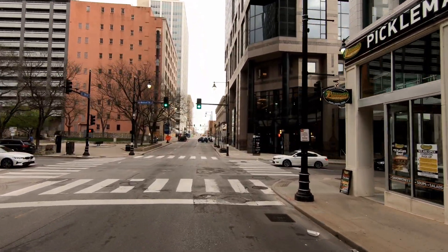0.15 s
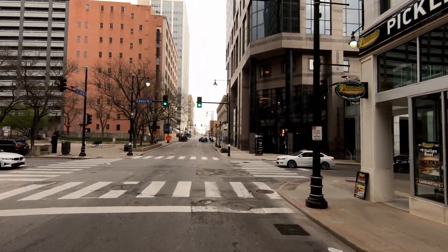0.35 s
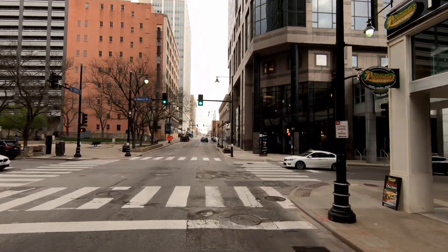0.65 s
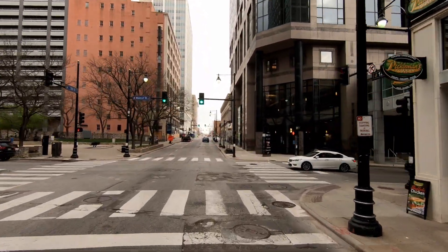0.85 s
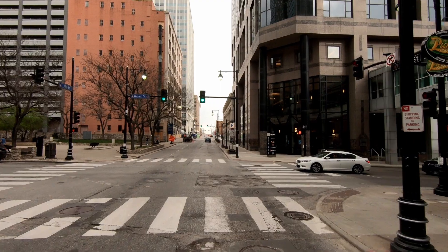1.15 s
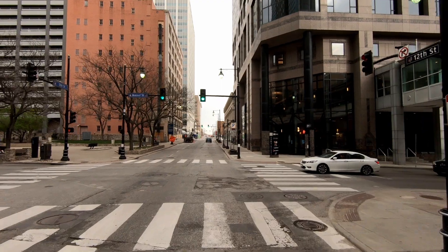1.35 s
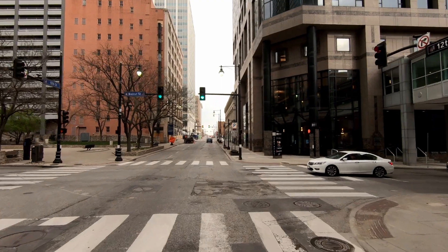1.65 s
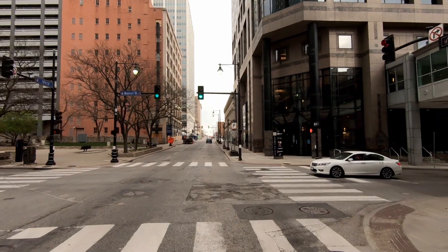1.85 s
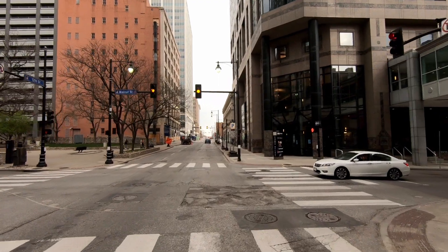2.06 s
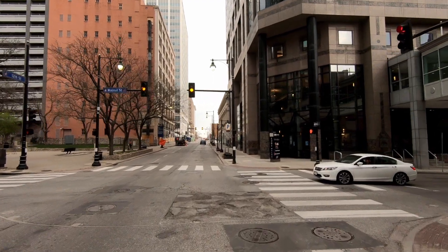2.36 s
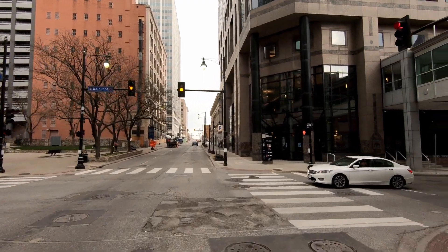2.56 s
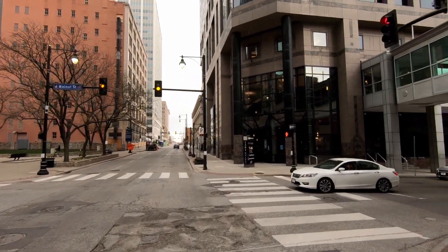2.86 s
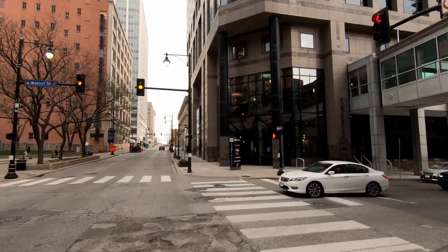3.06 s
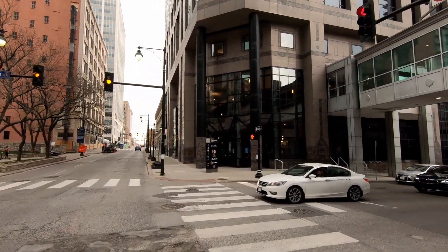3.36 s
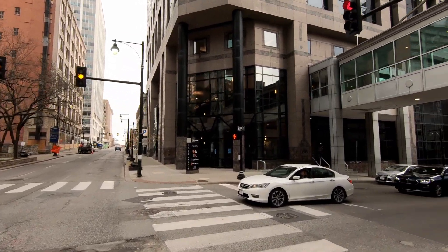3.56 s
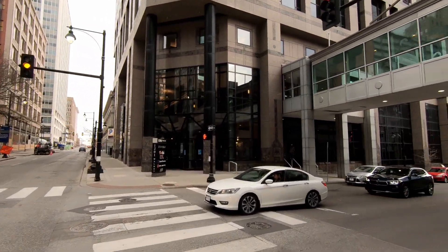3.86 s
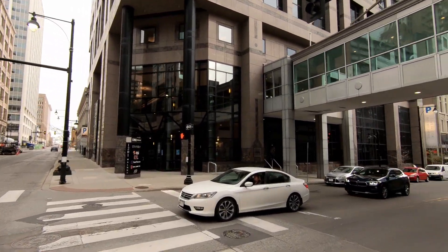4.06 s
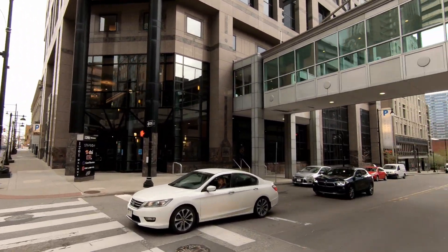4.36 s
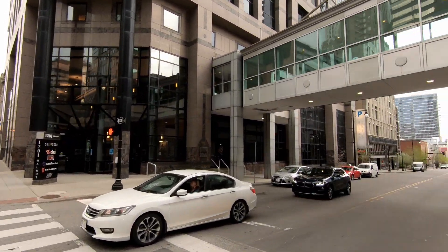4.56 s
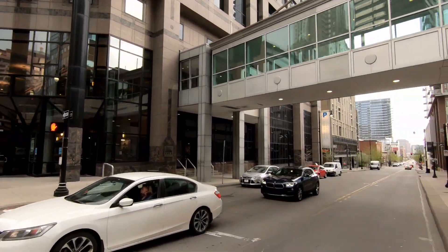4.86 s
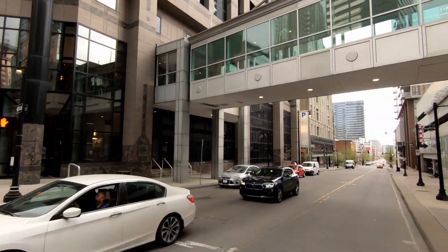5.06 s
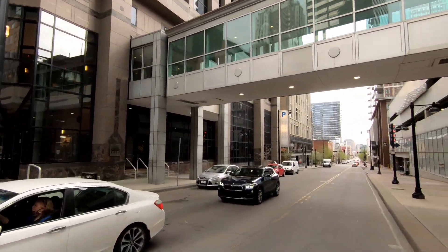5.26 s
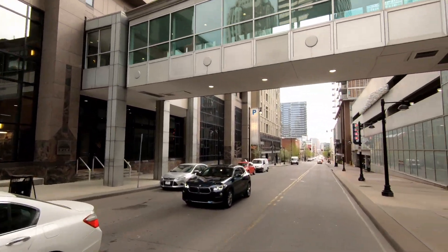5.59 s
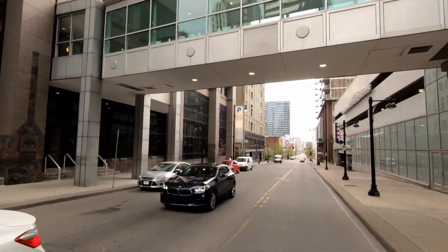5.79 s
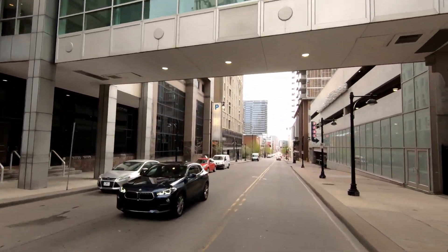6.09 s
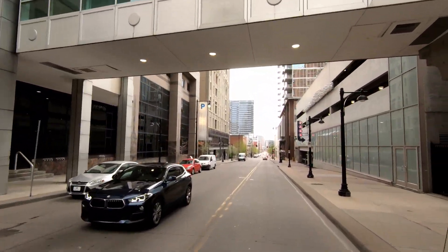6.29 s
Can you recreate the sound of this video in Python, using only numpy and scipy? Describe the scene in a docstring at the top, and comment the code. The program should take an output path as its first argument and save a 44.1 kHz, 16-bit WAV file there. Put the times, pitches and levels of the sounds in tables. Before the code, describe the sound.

A single microphone outside a car hears it roll through a city crossing and turn into a side street. From 0 s there is steady mid-low tyre roar, a coarse low drone, a faint hum near 210 Hz and soft airy hiss, with mild wind rumble and small gusts at 0.3-0.4 s. At about 2 s the paving becomes smoother and the drone drops; hiss flares briefly at 2.2 s and wind gusts begin to thump. Tiny high chirps come at 2.65 and 3.1 s. At 3.3 s a distant horn toots for under a tenth of a second, echoing between buildings, with a soft hoot after it. Drone returns from 4.4 to 5.4 s. Dull knocks sound near 5.2 s, then knocks, gritty scuffs and sharp stone ticks around 5.9-6.1 s. Wind buffeting grows deep and frequent from 5 s, strongest at the end, 6.4 s.

```python
"""City crossing and a side street: a car rolls through and turns in, microphone mounted outside.
Tyres roar, drone and hum: shaped noise and narrow tones that follow the road surface.
Wind buffets the microphone, harder as the car gathers speed: turbulent noise plus separate gusts.
A distant horn toots once, harmonics echoing between buildings; a soft hoot follows and faint chirps sound.
Grit ticks and scuffs under the wheels and dull knocks sound: short bursts of shaped noise."""
import sys
import numpy as np
from scipy import signal
from scipy.fft import rfft, irfft
from scipy.io import wavfile
from scipy.ndimage import uniform_filter1d

SR = 44100
rng = np.random.default_rng(int(sys.argv[2]) if len(sys.argv) > 2 else 0)


def wav_out(sig):
    """Save sig, one row per channel (or a flat mono array), as 16-bit PCM at SR to the path in sys.argv[1]."""
    wavfile.write(sys.argv[1], SR, np.round(np.clip(np.atleast_2d(sig).T, -1, 1) * 32767).astype(np.int16))


N = 283563
TIME = np.arange(N) / SR  # s

# All colours are relative spectra; bell half-lengths run from the middle to exp(-2) of the peak.
# Horn reed overtones. Each row: multiple of the pitch, relative level in dB.
HORN_OVERTONES = [(1, -3), (2, 0), (3, -2.5), (4, -2.5), (5, .5), (6, -2.5), (7, -14), (8, -18), (9, -14.5),
                  (10, -23)]
# Echoes off the nearest building fronts. Each row: delay in seconds, gain in dB.
FRONT_ECHOES = [(.051, -7), (.098, -12), (.135, -15), (.235, -15), (.3, -15)]
# Faint high chirps. Each row: middle in seconds, half-length in seconds, middle pitch in Hz, level in dB.
CHIRPS = [(2.65, .025, 7000, -74), (3.075, .018, 5850, -65), (3.181, .011, 5540, -65)]
# Short dull bursts of low-mid noise, one beneath a sharp tick.
# Each row: start in seconds, decay in seconds, level in dB.
DULL_KNOCKS = [(5.151, 0.0056, -40), (5.2, .006, -31.5), (5.927, 0.01, -41), (6.012, .004, -37)]
# Colour of the knocks. Each row: frequency in Hz, density in dB per Hz.
KNOCK_COLOUR = [(200, -22), (430, 8), (650, 5), (850, -5), (1300, -18), (4000, -58)]
# Tyres scuffing over loose grit. Each row: middle in seconds, half-length in seconds, level in dB.
GRIT_SCUFFS = [(5.928, 0.038, -50.5), (5.993, 0.034, -53), (6.05, 0.075, -57)]
# Colour of the scuffs. Each row: frequency in Hz, density in dB per Hz.
SCUFF_COLOUR = [(500, -12), (1300, 11), (2500, 0), (4000, -0.5), (6500, -2), (8500, -22), (10500, -37),
                (13000, -24), (15000, -41)]
# Stones snapping under the tread. Each row: start in seconds, decay in seconds, level in dB.
STONE_TICKS = [(5.762, .001, -52), (5.9885, .0007, -50), (5.9912, .001, -44), (6.0022, .0008, -35),
               (6.0075, .001, -50), (6.0122, .0016, -38), (6.0212, .001, -53), (6.082, .001, -55)]
# Colour of the ticks. Each row: frequency in Hz, density in dB per Hz.
TICK_COLOUR = [(800, 13), (2000, 21), (3800, 25), (6500, 13), (8500, 11), (10000, -5), (11500, -9),
               (14000, -16)]
# Airflow over the microphone before lulls, surging and trim. Each row: time in seconds, level in dB.
AIRFLOW = [(0, -39.5), (.9, -37), (1.3, -36.5), (1.5, -34.5), (2.5, -34.5), (3.2, -29), (3.55, -36.5),
           (4.0, -32), (4.3, -36.5), (4.9, -33), (5.25, -34), (5.85, -29), (6.2, -28.5), (6.43, -27)]
# Brief lulls in the airflow. Each row: middle in seconds, half-length in seconds, change in dB.
LULLS = [(0.535, 0.052, -4), (0.89, 0.039, -4.5), (1.12, 0.045, -4), (2.16, .03, -5), (3.56, 0.046, -1),
         (4.28, 0.033, -4), (4.854, .06, -7.5), (5.493, 0.017, -9), (5.903, .05, -3.5)]
# Strong gusts. Each row: middle in seconds, half-length in seconds, rumble level in dB,
# rumble pitch in Hz, flutter level in dB.
GUSTS = [(0.286, 0.037, -32, 45, -56), (0.403, 0.053, -36, 40, -40), (2.051, 0.13, -39, 75, -37.5),
         (2.237, 0.071, -27, 48, -34.5), (2.651, 0.032, -29, 38, -34.5), (2.979, 0.13, -25.5, 35, -47),
         (3.176, 0.075, -28, 55, -34), (3.304, 0.045, -24.5, 48, -38), (3.418, 0.04, -22, 38, -52),
         (3.683, 0.041, -28, 55, -46), (3.812, 0.015, -25, 55, -40), (3.998, 0.027, -26, 68, -44),
         (4.159, 0.063, -32, 50, -50), (5.045, 0.025, -24, 52, -49), (5.188, 0.13, -30, 62, -34.5),
         (5.297, 0.015, -35, 65, -33), (5.453, 0.031, -23, 58, -30), (5.557, 0.065, -22.5, 42, -35),
         (5.628, 0.037, -22.5, 58, -34.5), (5.716, 0.037, -23, 55, -27), (5.782, 0.023, -18.5, 45, -33),
         (5.952, 0.034, -22.5, 50, -49), (6.047, 0.12, -28, 80, -28), (6.234, 0.023, -22, 38, -35),
         (6.289, 0.02, -17.5, 72, -30), (6.331, 0.032, -24, 65, -28.5), (6.386, 0.03, -13.5, 44, -25.5)]
# Colour of the large eddies. Each row: frequency in Hz, density in dB per Hz.
RUMBLE_COLOUR = [(5, -34.5), (13, -18.5), (23, -2.5), (34, 1.5), (55, -2.5), (80, -2), (110, -9.5),
                 (170, -28), (400, -50.5), (1500, -99)]
# Colour of the small eddies. Each row: frequency in Hz, density in dB per Hz.
FLUTTER_COLOUR = [(50, -22.5), (90, -4), (115, -2.5), (160, -5), (210, -10), (280, -13.5), (400, -20.5),
                  (800, -51.5), (3000, -93)]
# Ring of the air inside the tyres. Each row: time in seconds, level in dB.
CAVITY_LEVEL = [(0, -46), (1.2, -47.5), (2.0, -52.5), (2.6, -45), (3.3, -58.5), (4.4, -58.5), (6.43, -48.5)]
# Hiss of the passing air, before flare and flicker. Each row: time in seconds, level in dB.
HISS_LEVEL = [(0, -61), (1.9, -64), (3.3, -64), (3.85, -63), (4.35, -64), (4.65, -59.5), (5.15, -61.5),
              (5.6, -58), (6.2, -60), (6.43, -57)]
# Colour of the hiss. Each row: frequency in Hz, density in dB per Hz.
HISS_COLOUR = [(1000, -17), (2500, 7.5), (3200, 1.5), (4000, 4.5), (5200, 1), (6500, 1), (7300, -9.5),
               (8100, -13.5), (9000, -22.5), (10500, -46), (14000, -34.5)]
# Coarse paving that makes the tyres drone. Each row: start in seconds, end in seconds, level in dB.
COARSE_PAVING = [(-.2, 1.48, -44), (1.48, 2.02, -42.5), (1.99, 3.1, -55), (4.36, 4.9, -46.5),
                 (4.9, 5.43, -44.5)]
# Colour of the carcass drone. Each row: frequency in Hz, density in dB per Hz.
DRONE_COLOUR = [(100, -19), (220, -0.5), (320, -0.5), (390, -1), (470, 3.5), (620, -2), (800, -8),
                (1200, -22), (2500, -39), (7000, -68.5)]
# Roar of the treads before trim. Each row: time in seconds, level in dB.
ROAR_LEVEL = [(0, -44), (1.2, -43.5), (2.3, -43), (2.87, -43), (3.02, -43.5), (4.0, -43.5), (4.6, -43.5),
              (5.3, -44.5), (5.55, -44), (5.95, -45), (6.1, -46.5), (6.43, -46)]
# Colour of the tread roar. Each row: frequency in Hz, density in dB per Hz.
TREAD_COLOUR = [(250, -18.5), (600, -3.5), (850, 2.5), (1100, 2), (1400, -2), (1900, -5.5), (2300, -13),
                (3100, -17.5), (4000, -15.5), (5000, -25.5), (6500, -42), (8000, -48), (11000, -80)]
# Faint tones of the turning tyres. Each row: pitch in Hz, width in Hz, level against the tread roar in dB.
WHINES = [(801, 18, -14.5), (1965, 16, -22), (2500, 18, -30.5)]

STREET_T60_S, STREET_TAIL_S, STREET_TOP_HZ, STREET_WET_DB = 2.9, 1, 3700, 5  # tail is cut at its length
HORN_START_S, HORN_LENGTH_S, HORN_RISE_S = 3.274, 0.07, 0.012
HORN_HZ, HORN_DB, HORN_SAG_HZ_PER_S = 572, -49, 130
HORN_WAVER, HORN_FLUTTER_DB = 0.0115, 4  # rms: fraction of the pitch; overtone level
HOOT_MIDDLE_S, HOOT_HALF_LENGTH_S, HOOT_HZ, HOOT_DB = 3.42, 0.06, 565, -49
CHIRP_FALL_HZ_PER_S, CHIRP_WAVER = 7400, 0.028  # waver: rms fraction of the pitch
SCUFF_GRAIN_DB, SCUFF_GRAIN_HZ = 3.5, 250
RUMBLE_TRIM_DB = -0.5
SURGE_DB, SURGE_HZ = 0.6, 4.9  # random surging of the airflow
BREEZE_DB, FLUTTER_DB = -35, -40  # reference airflow; flutter at that airflow
FLUTTER_FOLLOW_DB_PER_DB = 0.44
GUST_FLUTTER_TOP_HZ = 200  # large eddies sound deeper than the steady flutter
GUST_OCTAVES_BELOW, GUST_OCTAVES_ABOVE = 1, 0.39  # spread either side of the gust pitch
CAVITY_HZ, CAVITY_WIDTH_HZ = 213.7, 22
PATCH_S, PATCH_DB, PATCH_RISE_S, PATCH_FADE_S = 2.15, -58.5, 0.074, 0.3  # rough road repair
HISS_FLICKER_DB, HISS_FLICKER_HZ, HISS_PATCHES_DB = 0.56, 78, 0.5
SMOOTH_DRONE_DB, PAVING_EDGE_S = -48.5, 0.016  # drone on smooth asphalt; roll onto the next surface
ROAR_REFERENCE_DB, TREAD_TRIM_DB, TREAD_PATCHES_DB = -44, -1.72, 0.57
DRONE_FOLLOW_DB_PER_DB = 0.48  # drone against roar
LOW_ROAR_TOP_HZ, LOW_ROAR_EXTRA_DB_PER_DB = 780, 5  # low roar moves this much further
GRAIN_DB, GRAIN_HZ = 0.32, 70  # jolts from the stones in the asphalt
EDGE_HZ = 14700


def gain_of(db):
    """Decibels to amplitude."""
    return 10 ** (np.asarray(db) / 20)


def evened(x):
    """Scales to an rms of one."""
    return x / np.sqrt(np.mean(x ** 2) + 1e-20)


def over_time(points):
    """Interpolates rows of time and level at every sample."""
    return np.interp(TIME, *np.transpose(points))


def read(points, hz):
    """Reads a spectrum along a log-frequency axis."""
    point_hz, value = np.transpose(points)
    return np.interp(np.log(hz + 1), np.log(point_hz + 1), value)


def add(mix, start_s, sound):
    """Mixes a sound in at the given time."""
    part = mix[max(round(start_s * SR), 0):][:len(sound)]
    part += sound[:len(part)]


def coloured(x, colour):
    """Filters a sound to a spectrum, at unit power gain."""
    response = evened(gain_of(read(colour, np.fft.rfftfreq(N, 1 / SR))))
    return irfft(rfft(x) * response, N)


def noise(colour):
    """Steady noise of the given spectrum."""
    return evened(coloured(rng.standard_normal(N), colour))


def below(x, edge_hz):
    """Keeps the part of a sound under a soft edge."""
    return irfft(rfft(x) / (1 + (np.fft.rfftfreq(N, 1 / SR) / edge_hz) ** 4), N)


def drift(rate_hz):
    """Random motion up to about the given rate, rms one."""
    response = np.exp(-(np.fft.rfftfreq(N, 1 / SR) / rate_hz) ** 2)
    return evened(irfft(rfft(rng.standard_normal(N)) * response, N))


def tone(hz, width_hz):
    """A narrow wavering tone: a carrier times slow complex noise."""
    wander = drift(width_hz) + 1j * drift(width_hz)
    return evened((wander * np.exp(2j * np.pi * hz * TIME)).real)


def patchy(colour, patch_db, size=512):
    """Noise whose bands swell and fade separately."""
    overlap = size * 3 // 4
    _, _, bands = signal.stft(noise(colour), SR, nperseg=size, noverlap=overlap)
    patches = uniform_filter1d(rng.standard_normal(bands.shape), size=7, axis=0)  # across frequency
    patches = evened(uniform_filter1d(patches, size=28, axis=1))  # across time
    _, out = signal.istft(bands * gain_of(patch_db * patches), nperseg=size, noverlap=overlap)
    return evened(out[:N])


def turbulence(colour, size):
    """Churning noise whose strength stays even over spans of size samples."""
    x, window = noise(colour), np.hanning(size)
    power = signal.fftconvolve(abs(signal.hilbert(x)) ** 2, window / window.sum(), "same")
    return evened(x / np.sqrt(abs(power) + 1e-3))


def bell(middle_s, half_length_s):
    """Gaussian envelope with a peak of one."""
    return np.exp(-2 * ((TIME - middle_s) / half_length_s) ** 2)


def swells(rows):
    """Sum of bell-shaped bursts of amplitude."""
    return sum(gain_of(db) * bell(middle_s, half_length_s) for middle_s, half_length_s, db in rows)


def impacts(rows, colour, size=4096):
    """Bursts of noise of the given colour: near-instant rise, exponential decay."""
    out, source = np.zeros(N), noise(colour)
    t = TIME[:size]
    for start_s, decay_s, db in rows:
        fade = np.exp(-t / decay_s) * np.minimum(t / (0.14 * decay_s), 1)
        burst = evened(source[round(start_s * SR):][:size] * fade)
        add(out, start_s, gain_of(db) * burst * np.sqrt(np.mean(fade ** 2)))
    return out


def street(x):
    """Building fronts return a few echoes, then a diffuse tail, dulled by the long way round."""
    t = np.arange(STREET_TAIL_S * SR) / SR
    tail = rng.standard_normal(len(t)) * gain_of(-60 * t / STREET_T60_S) * np.minimum(t / 0.05, 1)
    diffuse = signal.fftconvolve(x, tail / np.linalg.norm(tail))[:N]
    out = x + gain_of(STREET_WET_DB) * below(diffuse, STREET_TOP_HZ)
    for delay_s, db in FRONT_ECHOES:
        add(out, delay_s, gain_of(db) * x)
    return out


def horn():
    """A reed toots on a slightly sagging pitch; each overtone flutters on its way down the street."""
    since_s = TIME - HORN_START_S
    sag_hz = HORN_SAG_HZ_PER_S * (np.clip(since_s, 0, HORN_LENGTH_S) - HORN_LENGTH_S / 2)
    pitch_hz = (HORN_HZ - sag_hz) * (1 + HORN_WAVER * drift(rate_hz=180))
    turns = np.cumsum(pitch_hz) / SR
    flutter = gain_of(HORN_FLUTTER_DB * drift(rate_hz=46))
    reed = np.zeros(N)
    for multiple, db in HORN_OVERTONES:
        own_flutter = np.roll(flutter, multiple * SR // 2)  # shifted, so overtones flutter apart
        reed += gain_of(db) * own_flutter * np.sin(2 * np.pi * multiple * turns)
    edge_s = np.minimum(since_s, HORN_LENGTH_S - since_s)
    gate = np.clip(edge_s / HORN_RISE_S, 0, 1) ** 0.5
    return street(gain_of(HORN_DB) * gate * evened(reed))


def hoot():
    """A faint low sine that swells briefly after the horn."""
    envelope = swells([(HOOT_MIDDLE_S, HOOT_HALF_LENGTH_S, HOOT_DB)])
    return envelope * evened(np.sin(2 * np.pi * HOOT_HZ * TIME))


def chirps():
    """Short sine squeaks with a falling, wavering pitch."""
    out = np.zeros(N)
    for middle_s, half_length_s, hz, db in CHIRPS:
        fall_hz = CHIRP_FALL_HZ_PER_S * np.clip(TIME - middle_s, -half_length_s, half_length_s)
        pitch_hz = hz * (1 + CHIRP_WAVER * drift(rate_hz=300)) - fall_hz
        squeak = evened(np.sin(2 * np.pi * np.cumsum(pitch_hz) / SR))
        out += swells([(middle_s, half_length_s, db)]) * squeak
    return out


def gust(middle_s, half_length_s, db, hz):
    """One large eddy shoves the microphone to and fro: a burst of low noise around a pitch."""
    t = np.arange(SR) / SR - 0.5
    octaves = np.log2((np.fft.rfftfreq(SR, 1 / SR) + 1) / hz)
    spread = np.where(octaves < 0, GUST_OCTAVES_BELOW, GUST_OCTAVES_ABOVE)
    churn = irfft(rfft(rng.standard_normal(SR)) * np.exp(-0.5 * (octaves / spread) ** 2), SR)
    envelope = np.exp(-2 * (t / half_length_s) ** 2)
    shove = gain_of(db) * evened(churn * envelope) * np.sqrt(np.mean(envelope ** 2))
    return np.interp(TIME, middle_s + t, shove, 0, 0)


def gusty(eddies, steady, gusts, top_hz):
    """Eddies at a steady strength; gusts add power to their deeper part only."""
    extra = np.hypot(steady, gusts) - steady
    return steady * eddies + extra * evened(below(eddies, top_hz))


def wind():
    """Large eddies rumble, small ones flutter, and gusts shove on the microphone."""
    lulls_db = sum(db * bell(middle_s, half_length_s) for middle_s, half_length_s, db in LULLS)
    airflow = gain_of(over_time(AIRFLOW) + lulls_db + SURGE_DB * drift(SURGE_HZ))
    rumble = gain_of(RUMBLE_TRIM_DB) * airflow * turbulence(RUMBLE_COLOUR, size=4400)
    shoves = sum(gust(middle_s, half_length_s, db, hz) for middle_s, half_length_s, db, hz, _ in GUSTS)
    steady = gain_of(FLUTTER_DB) * (airflow / gain_of(BREEZE_DB)) ** FLUTTER_FOLLOW_DB_PER_DB
    buffet = swells((middle_s, half_length_s, db) for middle_s, half_length_s, _, _, db in GUSTS)
    flutter = gusty(turbulence(FLUTTER_COLOUR, size=8000), steady, buffet, GUST_FLUTTER_TOP_HZ)
    return rumble + shoves + flutter


def knocks():
    """Short dull bursts of low-mid noise that die within milliseconds."""
    return impacts(DULL_KNOCKS, KNOCK_COLOUR)


def grit():
    """Loose grit scuffs as grainy noise and single stones crack sharply."""
    grains = noise(SCUFF_COLOUR) * gain_of(SCUFF_GRAIN_DB * drift(SCUFF_GRAIN_HZ))
    return impacts(STONE_TICKS, TICK_COLOUR) + swells(GRIT_SCUFFS) * evened(grains)


def cavity():
    """The road keeps the air inside the tyres humming at its resonance."""
    return gain_of(over_time(CAVITY_LEVEL)) * tone(CAVITY_HZ, CAVITY_WIDTH_HZ)


def hiss():
    """Passing air hisses as flickering high noise, flaring once over the rough repair."""
    since_s = np.maximum(TIME - PATCH_S, 0)
    fade = np.exp(-np.maximum(since_s - PATCH_RISE_S, 0) / PATCH_FADE_S)
    flare = np.minimum(since_s / PATCH_RISE_S, 1) * fade
    strength = np.hypot(gain_of(over_time(HISS_LEVEL)), gain_of(PATCH_DB) * flare)
    flicker = gain_of(HISS_FLICKER_DB * drift(HISS_FLICKER_HZ))
    return strength * flicker * patchy(HISS_COLOUR, HISS_PATCHES_DB)


def drone(roar_change_db):
    """Tyre carcasses drone low on smooth asphalt, louder over coarse stretches."""
    coarse = np.zeros(N)
    for start_s, end_s, db in COARSE_PAVING:
        entered = np.tanh((TIME - start_s) / PAVING_EDGE_S)
        left = np.tanh((TIME - end_s) / PAVING_EDGE_S)
        coarse += gain_of(db) * (entered - left) / 2
    strength = np.hypot(gain_of(SMOOTH_DRONE_DB), coarse)
    follow = gain_of(DRONE_FOLLOW_DB_PER_DB * roar_change_db)
    return strength * follow * turbulence(DRONE_COLOUR, size=6000)


def whines():
    """Turning tyres sing narrow wavering tones."""
    return sum(gain_of(db) * tone(hz, width_hz) for hz, width_hz, db in WHINES)


def tread_roar(roar_db, roar_change_db):
    """Treads roar as patchy noise with whines, its low part swelling and easing most."""
    tread = patchy(TREAD_COLOUR, TREAD_PATCHES_DB)
    extra = gain_of(LOW_ROAR_EXTRA_DB_PER_DB * roar_change_db) - 1
    tread = tread + extra * below(tread, LOW_ROAR_TOP_HZ)
    return gain_of(roar_db + TREAD_TRIM_DB) * (tread + whines())


def rolling():
    """Carcasses drone and treads roar, jolted by the stones in the asphalt, under the air's hiss."""
    roar_db = over_time(ROAR_LEVEL)
    roar_change_db = roar_db - ROAR_REFERENCE_DB
    tyres = drone(roar_change_db) + tread_roar(roar_db, roar_change_db)
    jolts = evened(gain_of(GRAIN_DB * drift(GRAIN_HZ)))
    return tyres * jolts + hiss()


def scene():
    """Everything that reaches the single microphone."""
    distant = horn() + hoot() + chirps()
    road = knocks() + grit() + cavity() + rolling()
    return (distant + wind() + road)[None]


def record(dry):
    """Low-pass band limit after a 4 ms fade-in."""
    lowpass = signal.firwin(511, EDGE_HZ, window=("kaiser", 9), fs=SR)
    return signal.oaconvolve(dry * np.minimum(TIME / 0.004, 1), lowpass[None], "same")


dry = scene()
out = record(dry)
wav_out(out)
```